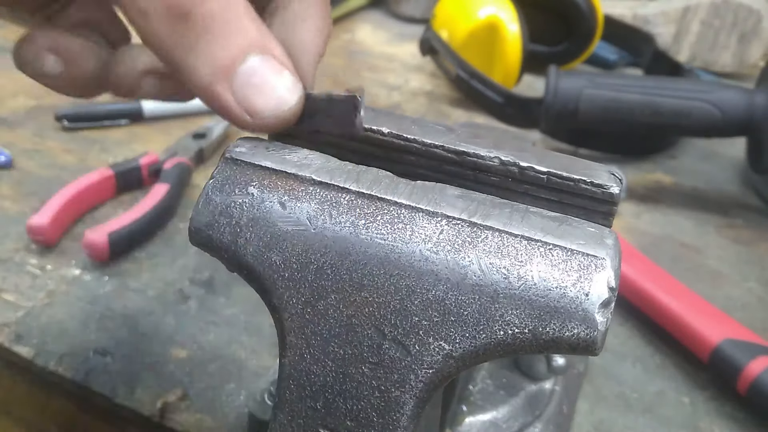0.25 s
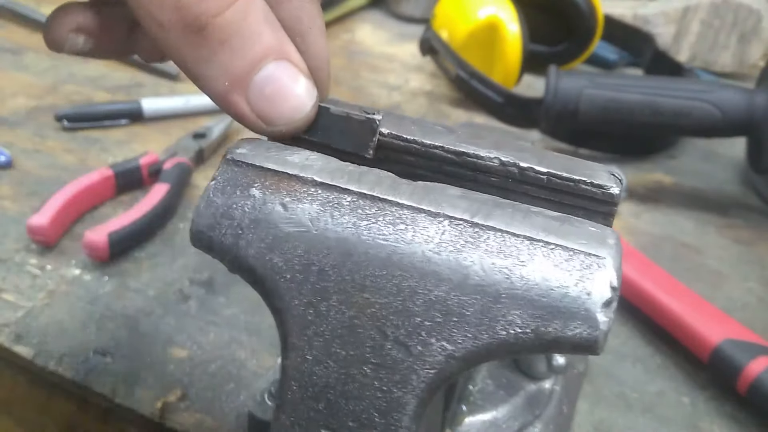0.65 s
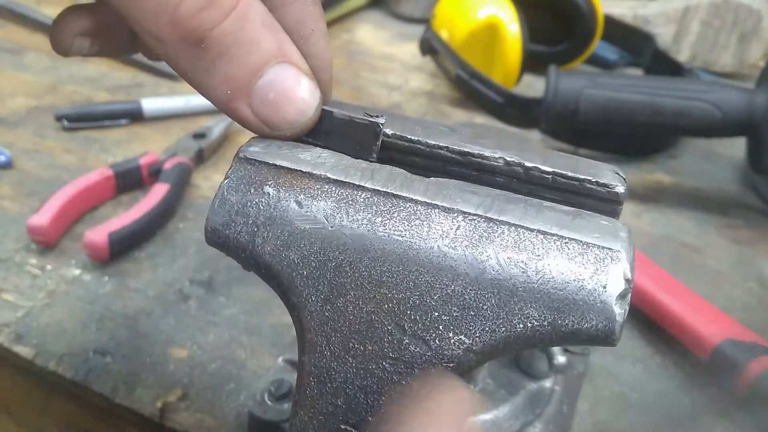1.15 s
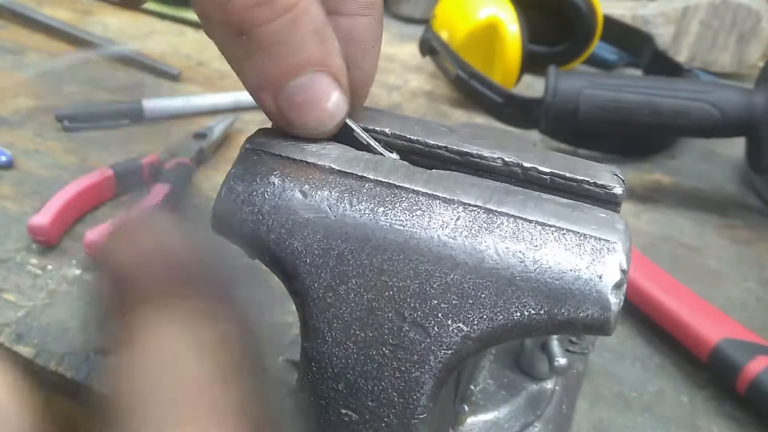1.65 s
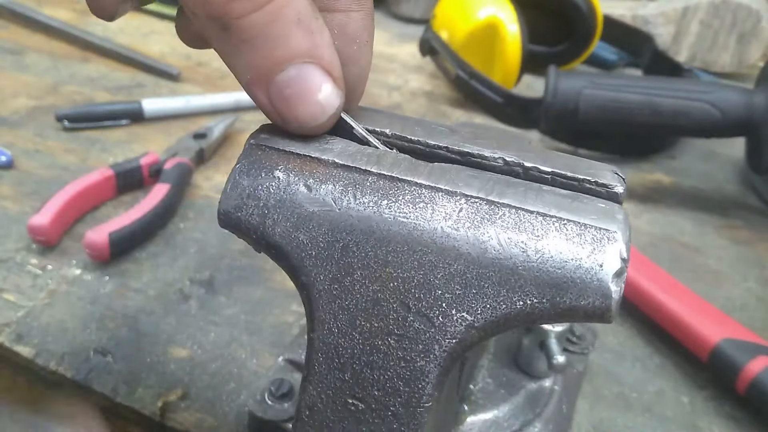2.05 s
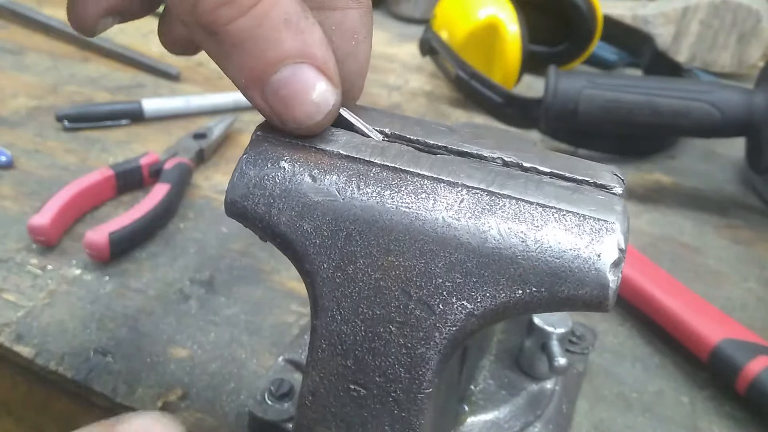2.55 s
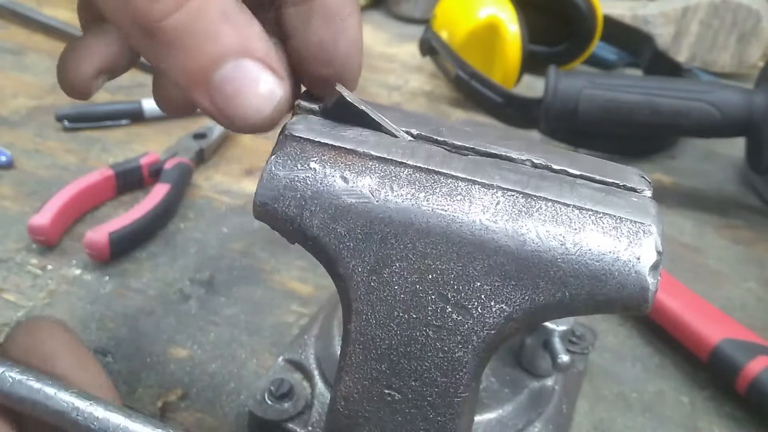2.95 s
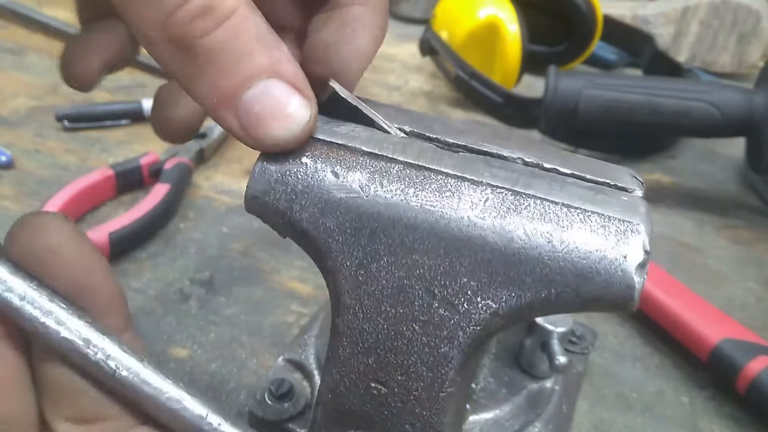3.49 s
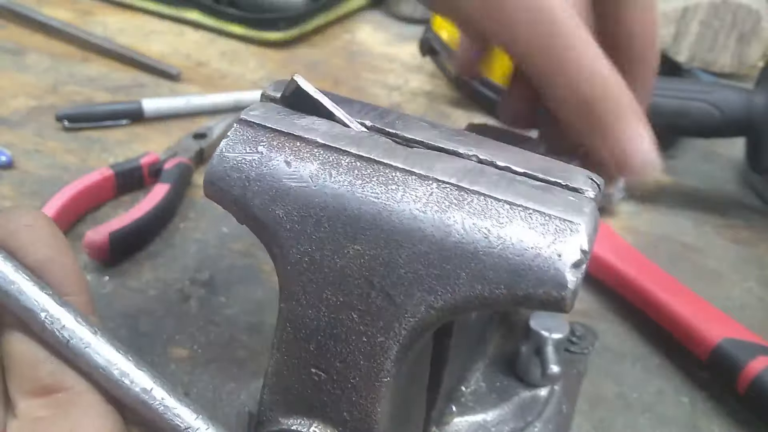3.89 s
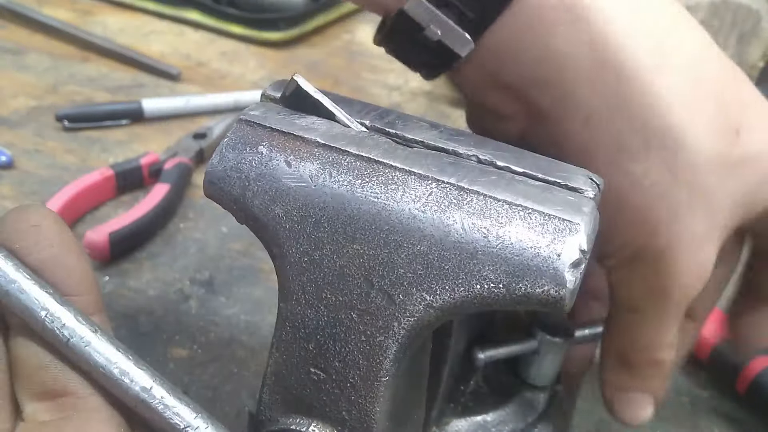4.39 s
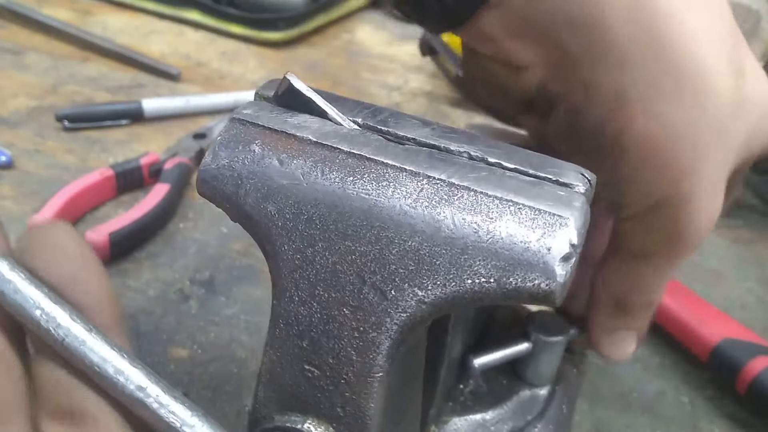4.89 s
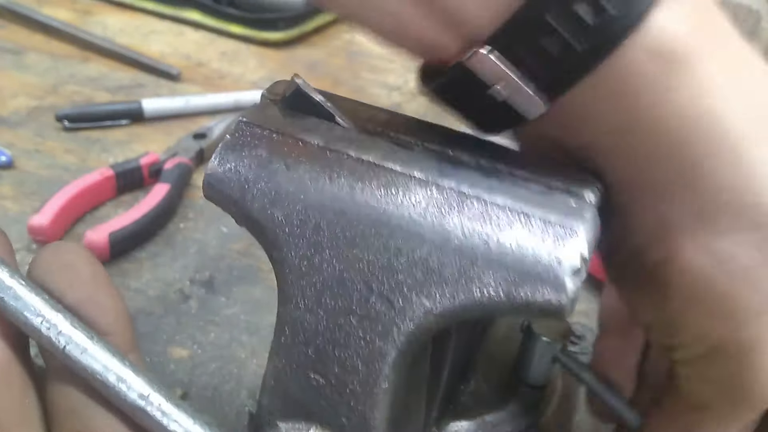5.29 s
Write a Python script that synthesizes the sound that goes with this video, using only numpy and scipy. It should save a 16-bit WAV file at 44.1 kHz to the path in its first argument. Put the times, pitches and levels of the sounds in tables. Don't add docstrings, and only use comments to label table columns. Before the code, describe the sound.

In a small workshop, a bench vise is wound shut on a scrap of steel: its handle rattles rapidly while the screw grinds and whistles thinly. Then heavier separate clunks jolt the vise, a cluster of bright steel clicks and scrapes follows, and a few hard knocks finish. The very close stereo microphone distorts on the blows, and a noise gate cuts pauses to silence.

```python
import sys
import numpy as np
from scipy import signal
from scipy.fft import rfft, irfft, next_fast_len
from scipy.io import wavfile
from scipy.ndimage import uniform_filter1d

SR = 44100
rng = np.random.default_rng(int(sys.argv[2]) if len(sys.argv) > 2 else 0)


def field_ratio(decibels):
    return 10 ** (np.asarray(decibels, dtype=float) / 20)


def transcribe(u):
    v = np.clip(np.atleast_2d(u).T, -1, 1)
    q = np.round(v * 32767).astype(np.int16)
    wavfile.write(sys.argv[1], SR, q)


N = 244314
SIZE = next_fast_len(N + SR // 2)

# start
# in seconds, deep casting level in dB, jaw level in dB, steel ring level in dB.
SCREW_KNOCKS = [(0.411, -37, -31.5, -17.5), (0.43, -16, -14.5, -16), (0.65, -4, -11, -56),
                (0.698, -26.5, -10, -13), (0.834, -11.5, -17.5, -21), (0.867, 4, 2.5, -36),
                (0.881, -4, -23.5, -48), (0.923, -17, -13, -21.5), (1.02, -4.5, 3, -6),
                (1.312, -17.5, -63.5, -61), (1.382, -5.5, -12, -30), (1.395, -3.5, -14.5, -16),
                (1.41, -8, -3, -13), (1.524, -6, -4.5, -32), (1.59, 1.5, -7, -33),
                (1.648, -18.5, -27, -21.5), (1.701, -15, -32, -27), (1.744, -15, -9, -28),
                (1.796, -32.5, -7.5, -18.5), (1.819, -9.5, -10.5, -10), (1.83, -13, -8.5, -11.5),
                (1.867, -19.5, -26.5, -31), (1.929, -8.5, -18, -19), (1.971, -1.5, 1, -10),
                (2.067, -18, -15, -36), (2.141, -21.5, -17.5, -62), (2.179, -8.5, -13, -23),
                (2.269, -19.5, -17.5, -59), (2.324, -20.5, -13, -28), (2.374, -4, -19, -55),
                (2.405, -6, -10.5, -17.5), (2.46, -13, -28.5, -43), (2.496, -21, -17, -30),
                (2.578, -11, -17, -30), (2.669, -2, -6.5, -43), (2.721, -7.5, -25, -56),
                (2.792, -25.5, -25, -59)]
# start in seconds, then levels in dB of deep casting, jaw, bench thud and steel ring.
JOLTS = [(0.472, -1, -2, -30, -17), (0.589, -17.5, -32, -42.5, -72.5), (2.86, -0.5, 5, -21, -18.5),
         (3.007, -20, -34, -22, -62), (3.02, -1, -4.5, -9, -23), (3.031, -9, -22, -17.5, -24.5),
         (3.237, -9.5, -18, -33.5, -51), (3.283, -4.5, -6.5, -12.5, -34), (3.375, -13.5, -23, -22.5, -55),
         (3.4, 0, -0.5, -0.5, -12), (3.393, -27, -35, -37.5, -26.5), (3.408, -11, -9.5, -27.5, -67),
         (3.607, -39, -47.5, -33.5, -57), (3.776, 6.5, -8.5, -3.5, -12), (3.781, -3, -3.5, -12.5, -0.5),
         (3.81, -2, 4, -44.5, -2), (5.009, -18, -27, -24, -34.5), (5.097, -22.5, -26, -18.5, -26.5),
         (5.127, 2.5, -6.5, -22, -23), (5.158, -40, -40, -30.5, -33), (5.296, -10, -21, -25, -27.5),
         (5.449, -12.5, -19.5, -26, -30), (5.48, -3.5, -15, -23.5, -44), (5.521, 6, -5.5, -26, -9.5),
         (5.535, -4.5, -5, -22, -30)]
# start in seconds, then levels in dB of body, steel ring and crack.
CLICKS = [(0.679, -13, -25, -11), (2.874, -30.5, -26.5, -67.5), (3.726, -58, -22, -45.5),
          (3.897, -16, -32.5, -49), (3.97, -32.5, -29, -48), (4.054, -34.5, -26, -45), (4.1, -20, -1, -3.5),
          (4.249, -30.5, -22, -51.5), (4.263, -38, -25, -50), (4.277, -29.5, -6, -12),
          (4.286, -20.5, 8, -13), (4.303, -14.5, 5, 2), (4.331, -17, -5, -40.5), (4.398, -27, -46, -17),
          (4.406, -21.5, -7, -31), (4.451, -34.5, -20, -31), (4.602, -34, -30.5, -58),
          (4.646, -23, -8.5, -20), (4.821, -54, -46, -68), (5.22, -12, -10.5, -30), (5.236, -24, -20, -26),
          (5.262, -34.5, -11, -25), (5.288, -24, -15, -34), (5.318, -40, -20, -41), (5.397, -14.5, -5, -41),
          (5.408, -14.5, -27, -42)]


def all_blows():
    silent = -150
    rows = [(s, cast, jaw, cast - 18, ring - 7.5, ring - 20, ring - 23, silent)
            for s, cast, jaw, ring in SCREW_KNOCKS]
    rows += [(s, cast, jaw, thud, ring, ring - 18, silent, silent)
             for s, cast, jaw, thud, ring in JOLTS]
    rows += [(s, body - 4.5, body, body - 36, ring - 9, crack, silent, ring - 14)
             for s, body, ring, crack in CLICKS]
    return np.transpose(sorted(rows))


# mode in Hz, level in dB, t60 in seconds.
CASTING = [(226, -4.5, 0.018), (352.3, -1.5, 0.032), (409.2, -1.5, 0.048), (430.6, 0.5, 0.035),
           (546.3, 1.05, 0.026), (623, -4.5, 0.048), (702, -11, 0.052)]
# mode in Hz, level in dB, t60 in seconds.
JAW = [(787, -6.5, 0.021), (932, -1, 0.023), (1028, 3.5, 0.01), (1226.6, 0.5, 0.019), (1307.6, -6, 0.027),
       (1447, -3.5, 0.017), (1573, -7.5, 0.018), (1961, -4.5, 0.012)]
# mode in Hz, level in dB, t60 in seconds.
BENCH = [(113.1, -1, 0.14), (167.4, -5.5, 0.16), (203, -4.5, 0.058), (254, -0.5, 0.083)]
# mode in Hz, level in dB.
STEEL = [(2700, 8), (2950, -3), (3160, -6), (3410, -10.5), (3530, 0.5), (3890, -4.5), (4250, 1), (4650, -5),
         (5050, -5), (5200, -10.5), (5560, -11), (6200, -15)]
STEEL_T60_S = 0.016
# mode in Hz, level in dB, t60 in seconds.
SMALL_STEEL = [(7150, 7.5, 0.0078), (7370, -1.5, 0.0078), (7450, 12, 0.0069), (9300, -6.5, 0.012),
               (9930, 0.5, 0.019), (11000, -17.5, 0.031), (11600, -15.5, .012), (13700, -37, .01)]
# mode in Hz, level in dB, t60 in seconds.
SCREW = [(8120, 1, 0.035), (6130, -1, 0.04), (11700, -9, .015), (4190, 5, 0.045), (4610, 1, 0.05),
         (2720, 4, 0.025), (3600, -1, 0.025), (5600, -5, 0.045), (5210, -11, .025), (6770, -14, .04),
         (9540, -17, .04), (11000, -15, .05), (13700, -17, .025)]
# mode in Hz, level in dB, t60 in seconds.
LEVER = [(572, -9.5, .03), (920, -11.5, .03), (1900, -3.5, 0.027), (3270, 5.5, 0.016), (3365, 5.5, 0.013),
         (3628, 0.5, 0.011), (4320, -3.5, .01), (5230, -1.5, 0.0085), (5840, -11.5, 0.0098),
         (6920, -4, 0.0082), (7060, -9, .009), (9340, -17, 0.0065), (10960, -25.5, 0.01),
         (11320, -18, 0.0054)]
# frequency in Hz, level in dB per Hz.
HISS = [(1290, -43.5), (2200, 0), (3570, -29.5), (4430, -12), (5040, -18), (5830, -15.5), (6520, -16.5),
        (7780, -19), (8570, -32.5), (11500, -38), (12800, -50), (15100, -61.5)]


def blows():
    chatter_s, seating_s, spread_db = 0.004, 0.0008, 1.5
    s, cast_db, jaw_db, thud_db, ring_db, crack_db, screw_db, lever_db = all_blows()
    which = np.clip(np.searchsorted(s * SR, np.arange(N), "right") - 1, 0, None)
    age = np.arange(N) / SR - s[which]
    since = np.maximum(age, 0)
    chatter = np.exp(-since / chatter_s) / np.sqrt(chatter_s * SR)
    contact = (age >= 0) * chatter * grit(per_s=2700, size_db=7.0)
    contact[np.ceil(s * SR).astype(int)] = 1.113
    seating = field_ratio(5.5) * chatter * np.clip(age / seating_s, 0, 1) * grit(per_s=7800, size_db=4.5)

    casting = modes(contact * field_ratio(cast_db[which] - 7.0), CASTING, which, spread_db)
    jaw = modes(contact * field_ratio(jaw_db[which] - 5.0), JAW, which, spread_db)
    push = (age >= 0) * np.exp(-since / 0.039) * rng.standard_normal(N)
    bench = modes(push * field_ratio(thud_db[which] - 38.0), BENCH, which, spread_db)
    plates = [(*mode, STEEL_T60_S) for mode in STEEL]
    steel = modes(seating * field_ratio(ring_db[which] - 16.0), plates, which, spread_db)
    small = modes(seating * field_ratio(crack_db[which] - 17.0), SMALL_STEEL, which, spread_db)
    crack = coloured(seating * (field_ratio(crack_db[which] + 2.5) + field_ratio(ring_db[which] + 2.0)), HISS)
    screw = modes(seating * field_ratio(screw_db[which]), SCREW, which, spread_db=2.5)
    lever = modes(seating * field_ratio(lever_db[which]), LEVER, which, spread_db)
    dull = signal.butter(2, [2300, 7000], "band", fs=SR, output="sos")
    return soft(casting + jaw) + bench + signal.sosfilt(dull, steel) + small + crack + screw + lever


# time in seconds, load as grinding level in dB, speed as whistle level in dB.
TURNING = [(0.64, -31.5, -81), (0.66, -31.5, -67.5), (0.72, -13, -44), (0.85, -21.5, -68.5),
           (0.93, -18.5, -54), (1.02, -29, -73.5), (1.1, -40, -73), (1.24, -50.5, -109), (1.32, -25.5, -89),
           (1.45, -21, -50), (1.55, -24.5, -74), (1.72, -27.5, -71), (1.85, -4, -50.5), (2.02, -28, -58.5),
           (2.4, -17.5, -61), (2.55, -21, -57.5), (2.7, -20.5, -68.5), (2.83, -59, -108.5)]
# peak in seconds, level in dB, extra jaw level in dB, rise in seconds, fall in seconds.
DRAGS = [(1.406, 0, -3, 0.026, 0.029), (1.828, -6, 3, 0.39, .08), (1.967, -1, -11, 0.25, 0.068),
         (2.862, -26, -7, 0.12, 0.21), (3.769, -18.5, -6.5, 0.044, 0.029), (3.901, -20.5, -2.5, 0.0072, .1),
         (4.076, -34, 18.5, 0.071, 0.11), (4.289, -39.5, 16.5, 0.063, 0.25),
         (4.609, -56.5, 17.5, 0.036, 0.11), (4.649, -44, 23.5, 0.0092, 0.07),
         (4.83, -45.5, -4, 0.018, 0.04), (5.007, -14, -10, 0.0094, 0.045), (5.131, -18, -3, 0.024, 0.015),
         (5.259, -27.5, 3.5, 0.35, 0.46), (5.405, -18, 10, 0.0046, 0.024), (5.522, -16.5, 7, 0.042, 0.16)]
# peak in seconds, steel level in dB, hiss level in dB, rise in seconds, fall in seconds.
SLIDES = [(0.696, -41.5, -40, 0.019, .2), (0.79, -34.5, -62, 0.049, 0.035), (1.06, -44, -84, 0.067, 0.1),
          (1.407, -35, -39.5, 0.052, .08), (1.5, -50.5, -58, 0.11, 0.76), (1.747, -30, -44, 0.011, 0.12),
          (1.828, -25.5, -31, 0.054, 0.051), (1.57, -50, -57, .06, .08), (2.406, -53.5, -47, .01, .1),
          (2.59, -48.5, -49, .12, 0.042), (2.88, -51, -70, .01, 0.075), (3.028, -44.5, -63.5, .02, 0.054),
          (3.41, -48.5, -63.5, .02, 0.15), (4.65, -38, -38.5, .01, 0.078), (5.102, -45, -61.5, .01, 0.046),
          (5.405, -33, -45, .01, 0.09), (1.969, -43, -47, 0.46, 0.17), (3.774, -45.5, -85, 0.12, 0.31),
          (3.923, -48.5, -45, 0.055, .15), (4.102, -31, -32.5, 0.1, .04), (4.09, -54.5, -63, 0.067, 0.063),
          (4.285, -39, -50.5, 0.12, 0.24), (4.409, -34, -42, .05, .04), (5.224, -19.5, -23, 0.011, 0.026),
          (5.284, -35.5, -36.5, 0.077, 0.13), (5.535, -34.5, -61, 0.1, .1)]


def grinding():
    spot = np.cumsum(rng.random(N) < 45.0 / SR)
    lumps_db = 2 * np.clip(rng.standard_normal(N), -1.3, 1.3)[spot]
    rub = grit(per_s=1600, size_db=4.0) * field_ratio(lumps_db)
    casting = rms_one(soft(modes(rub, CASTING, spot, spread_db=3.0)))
    jaw = rms_one(soft(modes(rub, JAW, spot, spread_db=2.5)))
    bench = field_ratio(-9) * rms_one(modes(rub, BENCH, spot, spread_db=11.0))

    fine = grit(per_s=2500, size_db=5.5) * field_ratio(rng.standard_normal(N)[spot])
    scrape = coloured(fine, HISS)
    plates = [(*mode, STEEL_T60_S) for mode in STEEL]
    steel = rms_one(modes(fine, plates, spot, spread_db=8.0))
    steel = rms_one(steel + field_ratio(-6.0) * rms_one(scrape))
    top = signal.sosfilt(signal.butter(4, 6500, "high", fs=SR, output="sos"), scrape)
    small = rms_one(modes(fine, SMALL_STEEL, spot, spread_db=13.0))
    hiss = rms_one(field_ratio(5.0) * rms_one(top) + small)

    load_db, speed_db = in_time(TURNING, column=1), in_time(TURNING, column=2)
    knock_s, knock_db, *_ = np.transpose(SCREW_KNOCKS)
    shudder_db = swells(knock_s, knock_db - 10, rise_s=0.006, fall_s=0.063)
    shake_db = np.maximum(load_db, shudder_db)
    s, drag_db, jaw_db, rise_s, fall_s = np.transpose(DRAGS)
    force_db = np.maximum(shake_db, swells(s, drag_db, rise_s, fall_s))
    jaw_force_db = np.maximum(shake_db, swells(s, drag_db + jaw_db, rise_s, fall_s))
    deep = smooth(np.minimum(force_db, -14))
    upper = smooth(np.minimum(jaw_force_db - 8, -23))
    winding = field_ratio(-4.0) * (deep * (casting + bench) + upper * jaw)

    s, steel_db, hiss_db, rise_s, fall_s = np.transpose(SLIDES)
    steel_level = smooth(load_db - 49.5) + smooth(swells(s, steel_db + 6, rise_s, fall_s)) + field_ratio(-62.5)
    hiss_level = smooth(speed_db - 30.5) + smooth(swells(s, hiss_db, rise_s, fall_s)) + field_ratio(-82)
    return winding + steel_level * steel + hiss_level * hiss


def whistle():
    spot = np.cumsum(rng.random(N) < 12.0 / SR)
    flutter = np.cumsum(rng.random(N) < 70 / SR)
    flutter_db = 4 * rng.standard_normal(N).clip(-2, 1.5)[flutter]
    friction = grit(per_s=500, size_db=3.5) * field_ratio(flutter_db)
    steady = rms_one(modes(friction, SCREW[:1], spot, spread_db=1.5))
    wandering = rms_one(modes(friction, SCREW[1:], spot, spread_db=4))
    speed_db = in_time(TURNING, column=2)
    stall_db = 2 * np.minimum(speed_db + 74, 0)
    steady_db = 0.5 * speed_db - 28 + stall_db
    return smooth(steady_db) * steady + smooth(speed_db + 13) * wandering


# band in Hz, t60 in seconds, level in dB, share heard alike at both ports from 0 to 1.
SHOP = [(128, 0.47, 0, 0.11), (332, 0.24, -1.5, 0.32), (875, 0.25, -4.5, 0.6), (1680, 0.12, -8.5, 0),
        (2960, 0.21, -6.5, 0), (5740, 0.13, -4.5, 0), (11960, 0.024, -8.5, 0.79)]


def workshop():
    t = np.arange(SR // 2) / SR
    tail = np.zeros((3, len(t)))
    for hz, t60, level_db, alike in SHOP:
        edges = [hz / 1.536, min(hz * 1.34, 19000)]
        sos = signal.butter(2, edges, "band", fs=SR, output="sos")
        band = signal.sosfilt(sos, rng.standard_normal(tail.shape))
        shares = np.sqrt(np.clip([[alike], [1 - alike], [1 - alike]], 0, 1))
        tail += shares * band * field_ratio(level_db - 60 * t / t60) / np.sqrt(t60 * SR / 14)
    return rfft(tail * np.clip(t / 0.0008, 0, 1), SIZE)


# frequency in Hz, level in dB per Hz.
AIR = [(88, -62), (150, -29), (624, -16), (936, -20), (1380, -14), (1460, -15.5), (2310, -27), (3270, -25),
       (15000, -39.5)]


def air():
    return field_ratio(-56.5) * rms_one(coloured(rng.standard_normal((2, N)), AIR))


def modes(force, table, spot, spread_db):
    out = np.zeros(N)
    strengths = field_ratio(spread_db * rng.standard_normal((spot.max() + 1, len(table))))
    for k, (hz, level_db, t60) in enumerate(table):
        r = field_ratio(-60 / (max(t60, 0.005) * SR))
        w = 2 * np.pi * hz / SR
        gain = np.sin(w) * field_ratio(level_db) * (-1) ** k
        drive = force * strengths[spot, k] + 1e-18
        out += signal.lfilter([0, gain], [1, -2 * r * np.cos(w), r * r], drive)
    return out


def grit(per_s, size_db):
    sizes = field_ratio(size_db * np.minimum(rng.exponential(1, N), 4)) * rng.choice([-1, 1], N)
    return rms_one(sizes * (rng.random(N) < per_s / SR))


def soft(force):
    return signal.sosfilt(signal.butter(3, [190, 1900], "band", fs=SR, output="sos"), force)


def swells(s, peak_db, rise_s, fall_s):
    t = np.arange(0, N, 16) / SR
    late = t[:, None] - s
    away = np.maximum(-late / np.maximum(rise_s, 0.003), late / np.maximum(fall_s, 0.003))
    level_db = np.max(peak_db - 30 * away, axis=1)
    return np.interp(np.arange(N) / SR, t, level_db)


def in_time(rows, column):
    rows = np.array(rows)
    return np.interp(np.arange(N) / SR, rows[:, 0], rows[:, column], -150, -150)


def smooth(level_db):
    return uniform_filter1d(field_ratio(level_db), size=260)


def rms_one(x):
    return x / np.sqrt(np.mean(x ** 2) + 1e-20)


def coloured(x, points):
    hz, db = np.transpose(points)
    grid = np.arange(SIZE // 2 + 1) * SR / SIZE + 1
    curve = field_ratio(np.interp(np.log(grid), np.log(hz), db, -90, -90))
    return irfft(rfft(x, SIZE) * curve, SIZE)[..., :N]


# frequency in Hz, phase lead of the left in radians, left minus right in dB.
PORTS = [(100, -1.1, -2.4), (180, 1.4, 0), (280, 1.3, 2.5), (450, -1.2, 3.8), (600, 0, 2), (1350, .1, 0),
         (1900, -2.9, -.6), (2550, -3.3, -1), (3100, -5.9, -2.5), (3700, -6.3, -2), (4100, -9.3, -1.5),
         (4750, -9.3, -1.6), (5600, -6.3, -1), (12000, 7.5, -4)]


def scene():
    hz, lead, balance_db = np.transpose(PORTS)
    grid = np.arange(SIZE // 2 + 1) * SR / SIZE
    side = np.array([[0.5], [-0.5]])
    ports = np.exp(1j * side * np.interp(grid, hz, lead)) * field_ratio(side * np.interp(grid, hz, balance_db))
    vise = blows() + grinding() + whistle()
    turn = 2 * np.pi * np.arange(N) / SR / 0.23
    heard = 0
    for weight in (np.cos(turn) ** 2, np.sin(turn) ** 2):
        scatter = workshop()
        heard = heard + rfft(vise * weight, SIZE) * (ports * (1 + scatter[0]) + scatter[1:])
    return irfft(heard, SIZE)[:, :N] + air()


# frequency in Hz, limit in dB against the neighbours.
MASK = [(2100, -10), (2600, -15), (6000, -14), (7000, -9), (9000, -6), (15000, -5)]


def drop_weak_bands(x):
    band_hz = 345
    hz, _, frames = signal.stft(x, SR, nperseg=1024)
    band = (hz // band_hz).astype(int)
    starts = np.flatnonzero(np.diff(band, prepend=-1))
    power = np.add.reduceat(np.mean(abs(frames) ** 2, axis=0), starts)
    power = uniform_filter1d(power, size=3, axis=1) + 1e-20
    k = np.arange(len(power))
    near = np.exp(-abs(k[:, None] - k) / 2.5) * (k * band_hz > 1700)
    around = (near @ power) / near.sum(axis=1, keepdims=True)
    margin = field_ratio(np.interp(k * band_hz, *np.transpose(MASK)))[:, None]
    chance = rms_one(uniform_filter1d(rng.standard_normal(power.shape), size=7, axis=1))
    floor = power.sum(axis=0) * field_ratio(-66) ** 2
    limit = np.maximum(around * margin ** 2, floor) * field_ratio(2.5 * chance) ** 2
    kept = 1 / (1 + (limit / power) ** 8)
    kept[k * band_hz < 2000] = 1
    return signal.istft(frames * kept[band], SR, nperseg=1024)[1][:, :N]


def band_limit(x):
    return signal.sosfilt(signal.butter(12, 15210, fs=SR, output="sos"), x)


# opens in seconds, shuts in seconds.
GATE = [
    (0, 0.042),
    (0.053, 0.1),
    (0.151, 0.204),
    (0.409, 3.71),
    (3.72, 4.228),
    (4.24, 4.5),
    (4.501, 4.588),
    (4.586, 4.785),
    (4.818, 4.872),
    (4.988, 5.936),
]


def record(dry):
    t = np.arange(N) / SR
    gate = sum(np.clip((t - opens) / 0.0031, 0, 1) * np.clip((shuts - t) / 0.012, 0, 1)
               for opens, shuts in GATE)
    heard = signal.sosfilt(signal.butter(3, [85, 14500], "band", fs=SR, output="sos"), dry)
    notch_hz, notch_width_hz = 2320, 300
    heard = heard - 0.65 * signal.lfilter(*signal.iirpeak(notch_hz, notch_hz / notch_width_hz, SR), heard)
    level_db = 10 * np.log10(uniform_filter1d(np.mean(heard ** 2, axis=0), size=900).clip(1e-12))
    hush = field_ratio(0.68 * np.clip(level_db + 39.5, -14, 0))
    clipped = np.clip(heard * hush * gate, -0.99, 0.99)
    top_cut = signal.butter(6, 15000, fs=SR, output="sos")
    mix = signal.sosfilt(top_cut, drop_weak_bands(clipped))
    return band_limit(mix)


dry = scene()
out = record(dry)
transcribe(out)
```